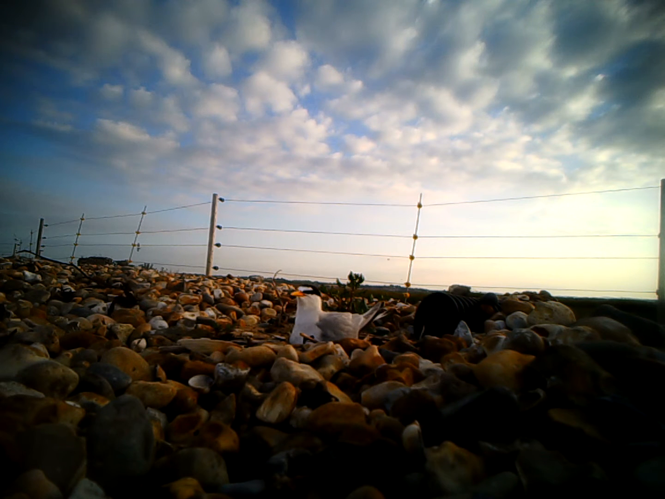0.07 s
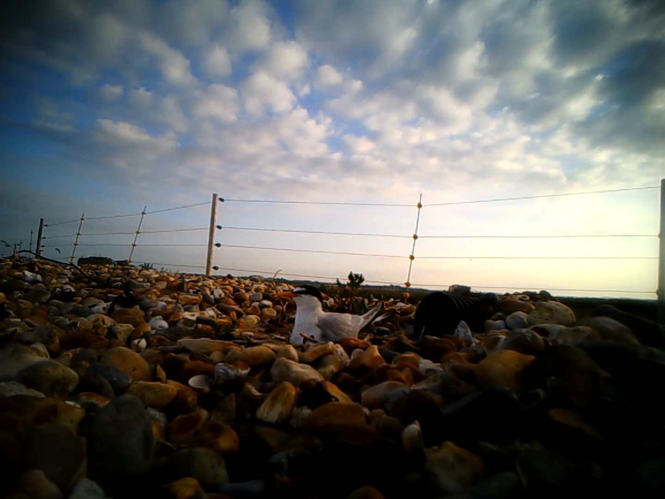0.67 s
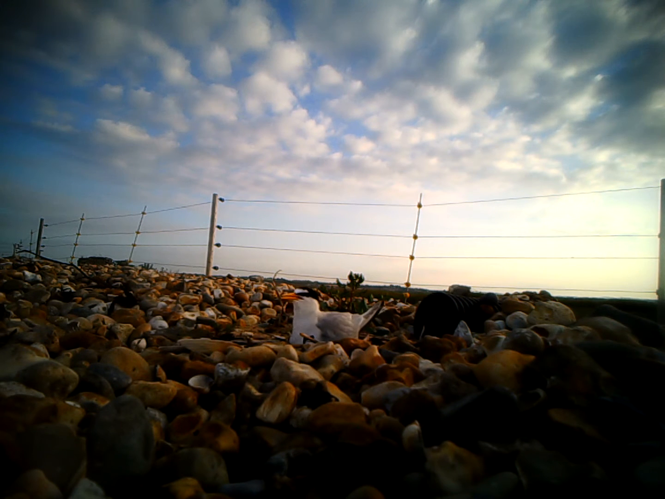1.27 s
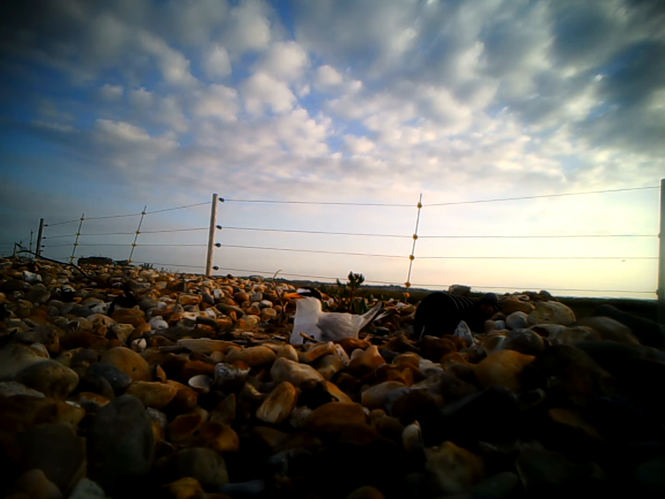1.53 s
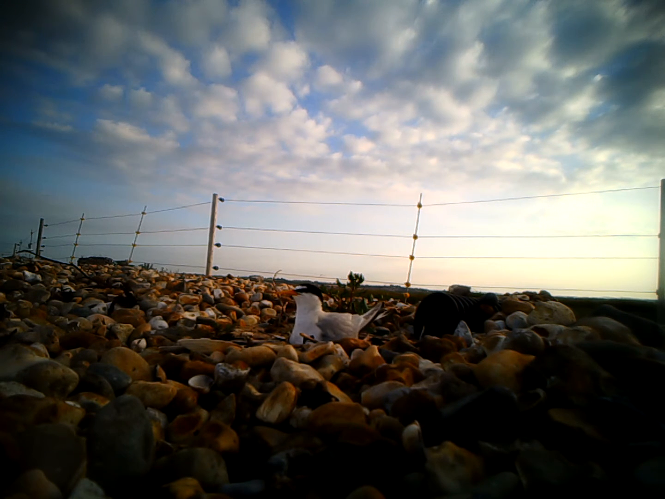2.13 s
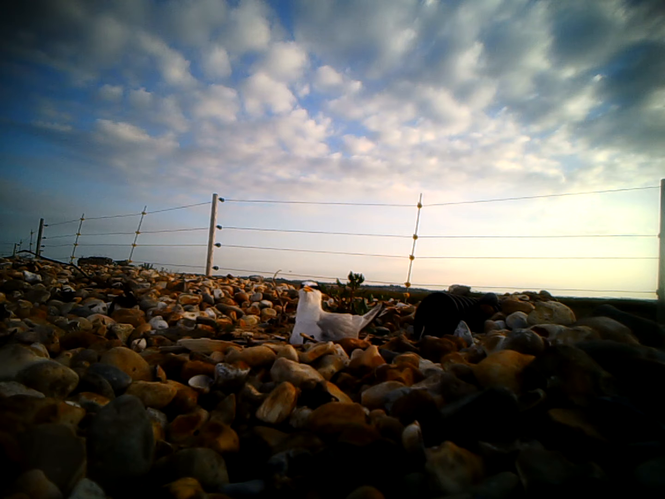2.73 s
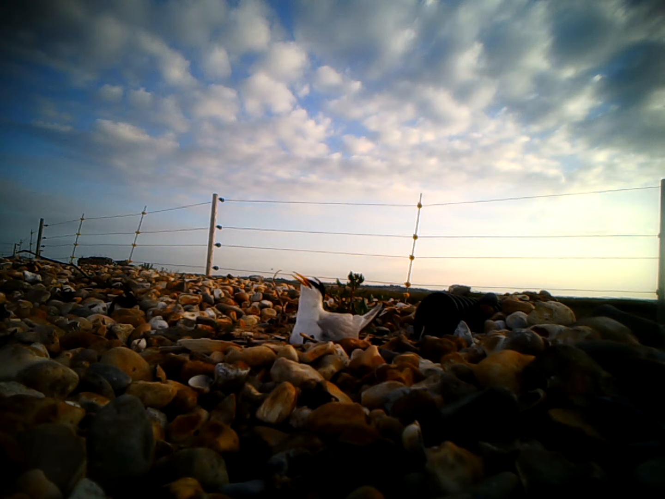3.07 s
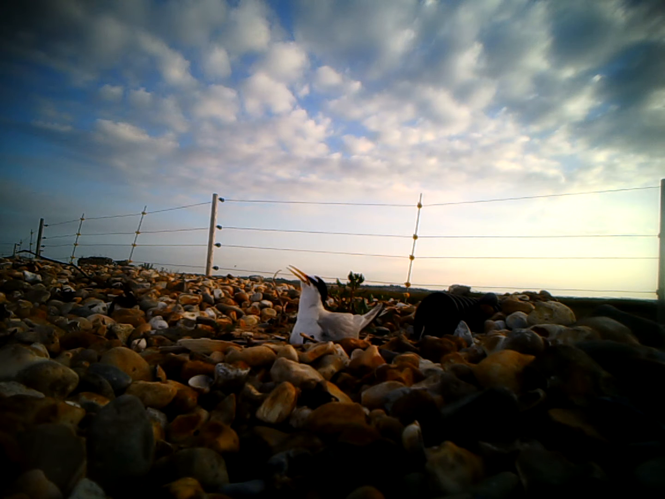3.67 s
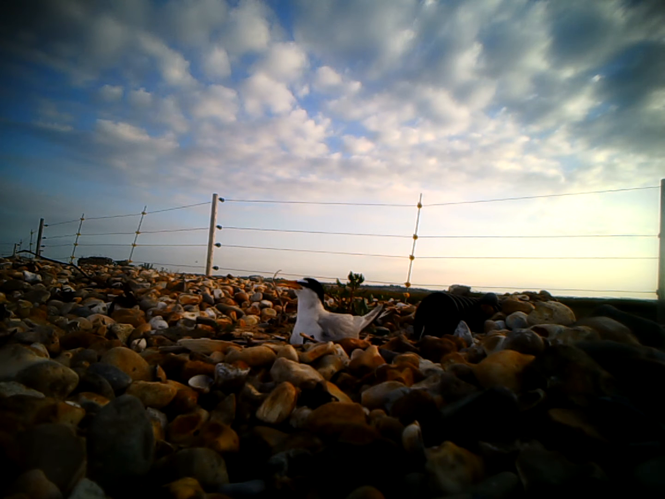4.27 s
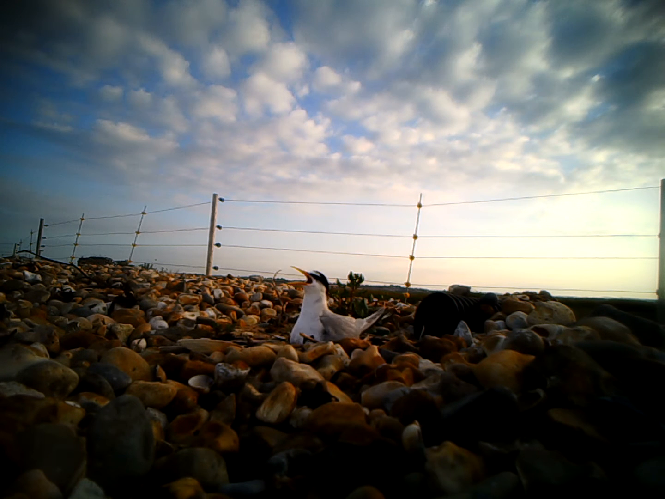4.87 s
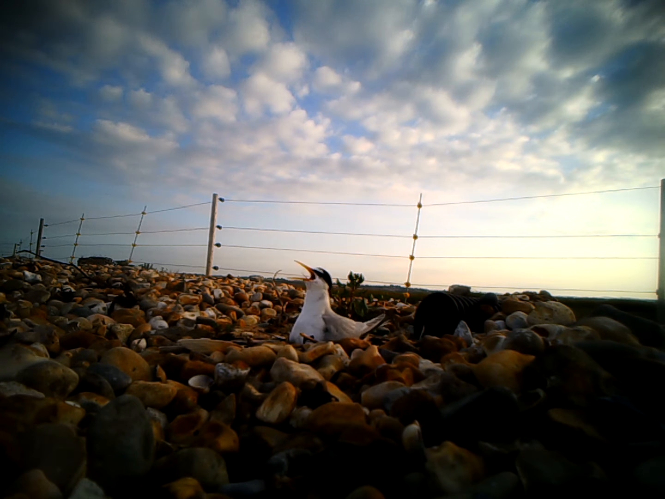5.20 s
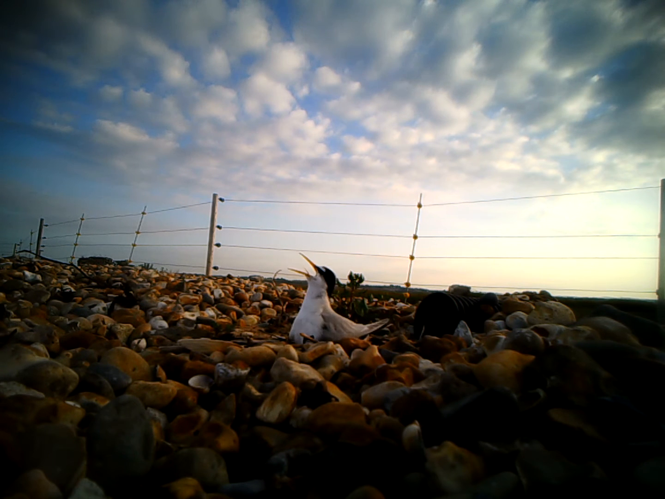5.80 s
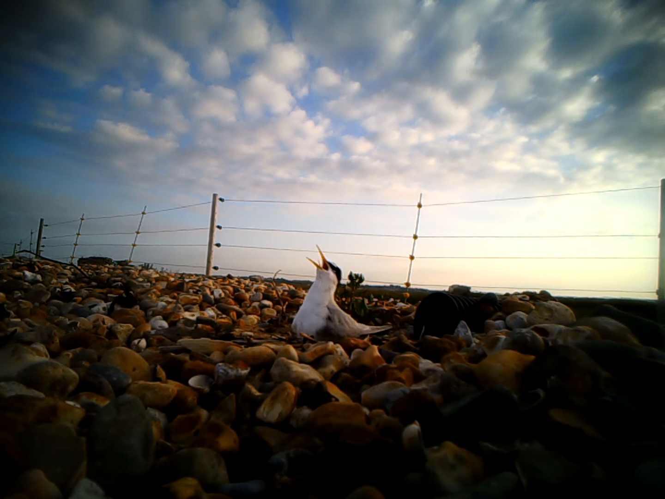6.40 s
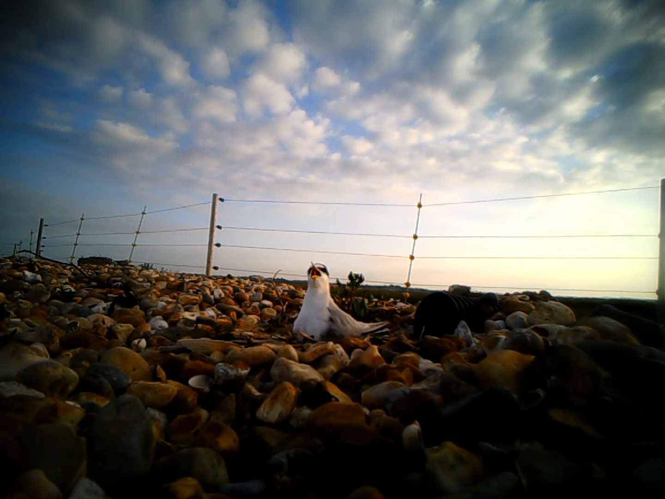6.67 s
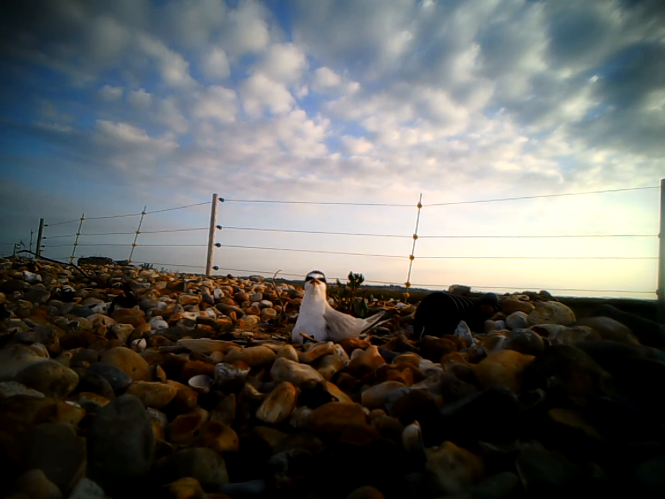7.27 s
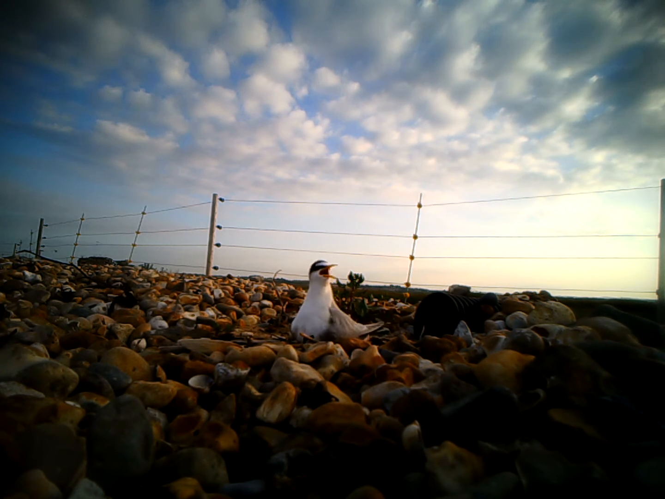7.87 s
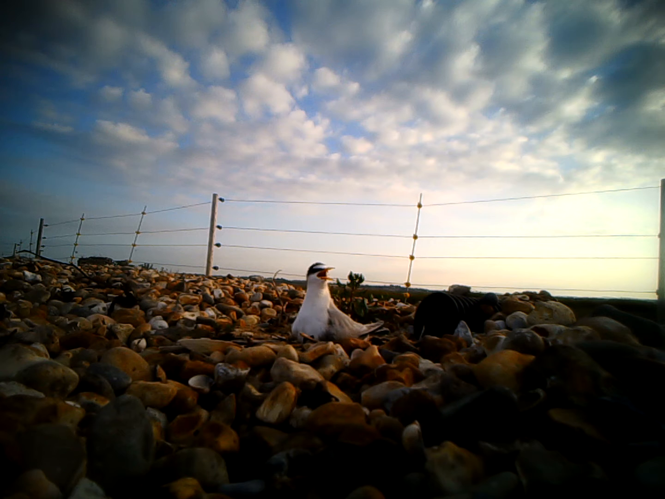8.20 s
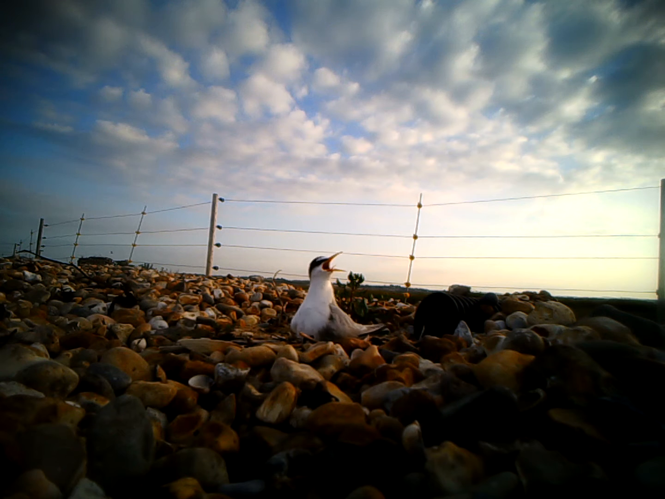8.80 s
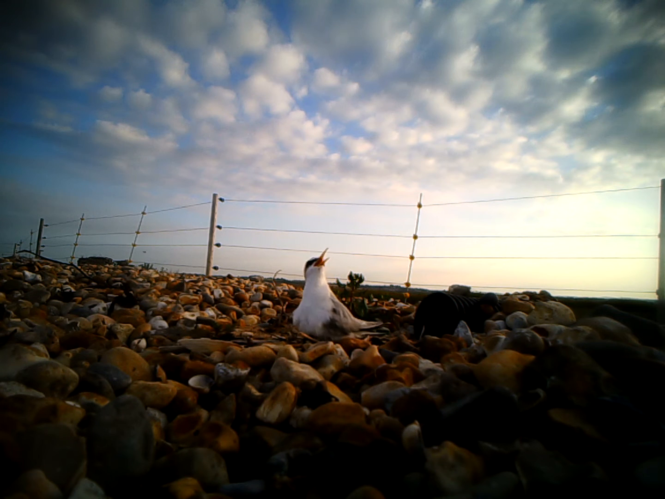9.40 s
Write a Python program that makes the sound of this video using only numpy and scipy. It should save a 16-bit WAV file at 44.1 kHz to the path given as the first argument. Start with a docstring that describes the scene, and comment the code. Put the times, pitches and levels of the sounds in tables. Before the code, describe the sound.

A tern screeches very close to a microphone on a pebble beach, with almost no echo. Each call is short, shrill and raspy, its pitch leaping up and dropping back two or three times. Single screeches come at about 1.2, 2.5 and 3.9 seconds. From 4.7 seconds they repeat three or four times a second, pause briefly just after 7, then resume from 7.5 until about 9.5 seconds. Its mate, also near but softer, adds brief thin whines and hoarse squeals around 1.9 seconds, on and off from 3.7 to 6, most strongly near 6.5, and again near 8.7. Far off, a small bird peeps about three times a second for the first two seconds, then only occasionally. Faint nasal cries and thin wavering whines come and go until about 7.5 seconds. A quiet, steady air rumble and hiss lie underneath throughout.

```python
"""Terns on a pebble beach

A tern screeches close to a microphone on the ground; its mate answers with softer whines and squeals.
Each screech is two or three arches of pitch: the voice breaks upward, a second voice makes it rasp,
and it drops back. Further off are peeps, nasal cries and thin whines, over faint air and mic hiss."""
import sys
import numpy as np
from scipy import signal
from scipy.fft import rfft, irfft
from scipy.io import wavfile
from scipy.ndimage import uniform_filter1d

SR = 44100
rng = np.random.default_rng(int(sys.argv[2]) if len(sys.argv) > 2 else 0)


def wav_out(sig):
    """Save sig, one row per channel (or a flat mono array), as 16-bit PCM at SR to the path in sys.argv[1]."""
    wavfile.write(sys.argv[1], SR, np.round(np.clip(np.atleast_2d(sig).T, -1, 1) * 32767).astype(np.int16))


N = 416744
BAND_LIMIT_HZ = 15750


def gain_of(db):
    """Decibels to amplitude."""
    return 10 ** (np.asarray(db) / 20)


def unit_rms(x):
    """Scales to rms 1."""
    return x / np.sqrt(np.mean(x ** 2) + 1e-20)


def db_at(spectrum, hz):
    """Reads (f/Hz, level/dB) points on a log-frequency axis."""
    f, db = np.transpose(spectrum)
    return np.interp(np.log(hz + 1), np.log(f + 1), db)


def phase_of(hz):
    """Running phase of a pitch curve, in radians."""
    return 2 * np.pi * np.cumsum(hz) / SR


def add(mix, start_s, sound):
    """Mixes a sound in at start_s."""
    part = mix[max(round(start_s * SR), 0):][:len(sound)]
    part += sound[:len(part)]


def smooth(x, size):
    """Rounds the corners of a curve."""
    return uniform_filter1d(uniform_filter1d(x, size), size)


def wobble(count, hz):
    """Random motion of rms 1, rolling off above hz."""
    f = np.fft.rfftfreq(count, 1 / SR)
    return unit_rms(irfft(rfft(rng.standard_normal(count)) / (1 + (f / hz) ** 4), count))


def resonate(x, spectrum):
    """Causal filter with the given spectrum: each pulse rings after it arrives."""
    log_gain = np.log(gain_of(db_at(spectrum, abs(np.fft.fftfreq(2048, 1 / SR)))))
    taps = np.fft.ifft(np.exp(np.conj(signal.hilbert(log_gain)))).real
    return signal.oaconvolve(x, taps[:len(taps) // 2])[:len(x)]


# Noise floor of the beach air and the microphone: f/Hz, relative density/dB
AIR_SPECTRUM = [(20, 2), (35, -14), (50, -5), (70, -10), (120, -16.5), (250, -21), (400, -23.5),
                (800, -25.5), (1550, -27.5), (3000, -30), (6000, -33), (13600, -35), (15500, -38)]
def air(level_db=-51):
    """A steady low rumble of air under even microphone hiss."""
    shape = gain_of(db_at(AIR_SPECTRUM, np.fft.rfftfreq(N, 1 / SR)))
    return gain_of(level_db) * unit_rms(irfft(rfft(rng.standard_normal(N)) * shape, N))


# Whines from far off in the colony: start t/s, length/s, from f/Hz, to f/Hz, level/dB
FAR_WHINES = [(0.799, 0.98, 1940, 1886, -72), (2.65, 0.2, 1850, 1940, -66),
              (3.198, 1.37, 1540, 1947, -67.5), (4.435, 0.59, 2120, 2075, -57.5),
              (5.984, .3, 2270, 2230, -54.5)]
def far_whines(waver=.022, swell_db=4):
    """Thin tones that waver and come and go."""
    out = np.zeros(N)
    for start, length, from_hz, to_hz, db in FAR_WHINES:
        count = int(length * SR)
        drift = wobble(count, hz=6.9) + 2 * wobble(count, hz=160)
        hz = np.linspace(from_hz, to_hz, count) * (1 + waver * drift)
        envelope = gain_of(db + swell_db * wobble(count, hz=19)) * signal.windows.tukey(count, .3)
        add(out, start, np.sin(phase_of(hz)) * envelope)
    return out


# A small bird some way off: middle t/s, top f/Hz, level/dB
PEEPS = [(.131, 3250, -55), (.437, 3250, -54.5), (.772, 3260, -53.5), (1.13, 3280, -53),
         (1.511, 3230, -53.5), (1.968, 3230, -54), (3.47, 2870, -57.5), (4.346, 3250, -58),
         (7.214, 3250, -54)]
def peeps(length_s=.06, sag=.29, fade_db=-10, octave_db=-21):
    """Nearly pure whistles that rise and fall."""
    out, u = np.zeros(N), np.linspace(-1, 1, int(length_s * SR))
    for middle, top_hz, db in PEEPS:
        phase = phase_of(top_hz * (1 - sag * u ** 2))
        whistle = np.sqrt(2) * (np.sin(phase) + gain_of(octave_db) * np.sin(2 * phase))
        envelope = gain_of(db + fade_db * u ** 2) * signal.windows.tukey(len(u), .2)
        add(out, middle - length_s / 2, whistle * envelope)
    return out


def syrinx(hz, level_db, rasp, second_hz, throat, jitter, wander, hiss, pull,
           throb=.11, soft_db=-13, slack_range_db=13):
    """One membrane pulses at hz; the other pulls at it, setting sidebands between the harmonics."""
    count, rasp = len(hz), np.clip(rasp, 0, 1)
    second_phase = phase_of(second_hz * (1 + wander * wobble(count, hz=197)))
    hz = hz * (1 + jitter * (.8 + rasp) * wobble(count, hz=500))
    phase = phase_of(hz) + pull * rasp * np.sin(second_phase)
    # with little effort the membrane closes softly and loses treble
    slack = np.minimum((level_db.max() - level_db) / slack_range_db, 1) ** 2
    tilt_db = soft_db * slack * hz / BAND_LIMIT_HZ
    pulses = sum(gain_of(tilt_db * k) * np.cos(k * phase) * np.clip((BAND_LIMIT_HZ - k * hz) / hz, 0, 1)
                 for k in range(1, 30))
    breath = hiss * (.3 + rasp) * (1 - .5 * slack) * (1 + np.cos(phase))  # air escapes at each opening
    voice = resonate(unit_rms(pulses) + breath * rng.standard_normal(count), throat)
    voice /= np.sqrt(smooth(voice ** 2, size=120) + 1e-12)
    voice *= 1 + throb * rasp * np.cos(phase - 2 * second_phase)  # the two voices beat
    flutter_db = np.interp(hz / hz.max(), [.55, .9], [1.7, .7])  # deeper at low pitch
    envelope = gain_of(level_db + flutter_db * wobble(count, hz=170))
    from_edge = np.minimum(np.arange(count), np.arange(count)[::-1])
    return voice * envelope * np.minimum(from_edge / 60, 1)


# Tone of the cries as they reach the microphone over the shingle: f/Hz, level/dB
CRY_SPECTRUM = [(900, -29), (2000, -5), (3000, -5.5), (4100, -4.5), (5050, 3), (6000, -11.5), (7500, -15.5),
                (10000, -29)]
# Cries further along the beach: middle t/s, length/s, top f/Hz, level/dB, rasp/0-1
NASAL_CRIES = [(0.379, 0.21, 953, -61, 0.5), (1.057, 0.2, 975, -63.5, 0.06),
               (2.462, 0.13, 1153, -55.5, 0.2), (3.107, 0.18, 1004, -52.5, 0.4),
               (3.282, 0.19, 1040, -60, 0.8), (3.555, 0.18, 1009, -49.5, 0.27),
               (4.493, 0.11, 1034, -53, 0.35), (4.618, 0.27, 1007, -56.5, 1),
               (6.313, 0.15, 963, -51.5, 0.26), (6.911, 0.1, 1030, -49.5, 0.5),
               (7.397, 0.13, 1036, -47.5, 0.25)]
def nasal_cries(sag=.12, fade_db=-11, rattle_hz=85):
    """Each cry swells and fades on one shallow arch of pitch, with a fast, uneven rattle."""
    out = np.zeros(N)
    for middle, length, top_hz, db, rasp in NASAL_CRIES:
        u = np.linspace(-1, 1, int(length * SR))
        rattle = np.sin(phase_of(rattle_hz * (1 + .22 * wobble(len(u), hz=38.8))))
        hz = top_hz * (1 - sag * u ** 2 + .01 * rattle + .007 * wobble(len(u), hz=25))
        cry = syrinx(hz, db + fade_db * u ** 2, rasp, .4 * hz, CRY_SPECTRUM,
                     jitter=.01, wander=.1, hiss=.06, pull=.45)
        flicker = gain_of(2 * wobble(len(u), hz=30) - 1)
        add(out, middle - length / 2, cry * (1 + .65 * rattle) * flicker)
    return out


# A tern's throat and bill from close by: f/Hz, level/dB
THROAT_SPECTRUM = [(350, -15), (950, -21.5), (1300, -17.5), (1800, -21), (2600, -11), (3300, -4),
                   (4000, -1), (5050, 4.5), (5900, -6.5), (7000, -13.5), (8800, -33.5), (10500, -33),
                   (13200, -46), (15500, -38)]
# The bill opens and turns: t/s, factor on throat resonances, low ring/dB, high ring/dB, top treble/dB
BILL_POSES = [(1.22, 0.89, 17.5, 19, -5), (2.53, 0.94, 17, 19, 1.5), (3.92, 0.95, 19, 16, -1.5),
              (4.97, 1, 13, 8, 3), (5.8, 1, 10.5, 13.5, 2.5), (6.6, 1.015, -0.5, 18, 0),
              (7.8, 1.007, 4, 16, 2), (9.3, 1.019, 1, 20.5, 0.5)]
def throat_at(time_s, low_ring_hz=7950, high_ring_hz=11950, low_width_hz=520, high_width_hz=750):
    """The throat's spectrum at one moment, with two treble resonances of the open bill."""
    times, *columns = np.transpose(BILL_POSES)
    stretch, low_db, high_db, top_db = (np.interp(time_s, times, column) for column in columns)
    hz = np.geomspace(300, BAND_LIMIT_HZ, 200)
    low_ring = low_db * np.exp(-((hz - low_ring_hz) / low_width_hz) ** 2)
    high_ring = high_db * np.exp(-((hz - high_ring_hz) / high_width_hz) ** 2)
    shelf = db_at([(7000, 0), (10000, top_db)], hz)
    return np.c_[hz, db_at(THROAT_SPECTRUM, hz / stretch) + low_ring + high_ring + shelf]


def mate_note(hz, db, rasp, throat, attack_s=.0089, release_s=.007, edge_db=-14,
              quaver_share=.018, quaver_db=2.2, quaver_hz=90, **grain):
    """One note on the pitch curve hz: it swells, holds and fades, and quavers when hoarse."""
    t = np.arange(len(hz)) / SR
    shut = 1 - np.minimum(np.minimum(t / attack_s, t[::-1] / release_s), 1)
    hz = hz * (1 + quaver_share * rasp * wobble(len(t), hz=quaver_hz))
    db = db + edge_db * shut + quaver_db * rasp * wobble(len(t), hz=quaver_hz)
    return syrinx(hz, db, rasp, .34 * hz, throat, pull=.65, **grain)


# The mate whines near the microphone: start t/s, length/s, from f/Hz, to f/Hz, warble/share of pitch,
# level/dB before the tone filter, rasp/0-1, factor on throat resonances
MATE_WHINES = [(1.853, 0.068, 1314, 1580, 0, -46.5, 0.3, 1.19),
               (3.799, 0.081, 943, 1530, 0.0041, -35.5, 0.34, 1.08),
               (5.213, 0.063, 1147, 1130, 0.021, -46.5, 0.35, .88),
               (5.732, 0.08, 1270, 1315, 0.034, -35, .35, 0.88),
               (5.846, 0.046, 1364, 1413, 0.026, -26.5, 0.76, 0.98),
               (5.915, 0.086, 1490, 1394, 0.047, -34, 0.4, 1.14),
               (6.506, 0.102, 1362, 1416, 0.075, -24, .1, 1.04),
               (8.671, 0.051, 1290, 1400, 0, -37.5, 0.1, 1.02),
               (9.019, 0.038, 2240, 2460, 0, -54, .1, 0.76)]
# Its squeals: start t/s, length/s, top f/Hz, level/dB before the tone filter, factor on throat resonances
MATE_SQUEALS = [(1.893, .054, 2210, -41.5, 1.23), (3.655, 0.099, 2230, -46.5, 1.1),
                (3.877, 0.045, 2276, -24.5, 1.16), (4.177, 0.072, 1970, -47.5, 1.02),
                (4.256, 0.095, 2160, -41.5, 1.02), (4.882, 0.074, 2360, -36, 1.04),
                (5.685, 0.045, 2430, -35.5, 0.77), (6.437, 0.061, 2535, -24, 0.94),
                (6.521, 0.031, 2160, -17.5, 1.02), (6.556, 0.025, 2050, -22.5, 1),
                (8.712, 0.07, 2020, -34, 1.06)]
def mate(warble_hz=40.9, db_per_octave=22, squeal_sag=.0707, squeal_peak=.65, squeal_fade_db=-4):
    """Thin whines glide and warble, louder as they rise; hoarse squeals follow one high, shallow arch."""
    out = np.zeros(N)
    for start, length, from_hz, to_hz, warble, db, rasp, stretch in MATE_WHINES:
        t = np.arange(0, length, 1 / SR)
        hz = np.linspace(from_hz, to_hz, len(t)) * (1 - warble * np.cos(2 * np.pi * warble_hz * t))
        level_db = db + db_per_octave * np.log2(hz / hz.mean())
        throat = throat_at(start) * [stretch, 1]
        add(out, start, mate_note(hz, level_db, rasp, throat, jitter=.004, wander=.04, hiss=.015))
    for start, length, top_hz, db, stretch in MATE_SQUEALS:
        droop = (np.linspace(0, 1, int(length * SR)) / squeal_peak - 1) ** 2
        squeal = mate_note(top_hz * (1 - squeal_sag * droop), db + squeal_fade_db * droop, rasp=.9,
                           throat=throat_at(start) * [stretch, 1], jitter=.011, wander=.08, hiss=.055)
        add(out, start, squeal)
    tone = [(1400, -7.5), (3500, -2.5), (4350, 2.5), (5000, -3),
            (5700, -1.5), (7800, -9.5), (9200, -1), (12000, -1)]  # f/Hz, level/dB
    return resonate(out, tone)


# The close tern's voice, arch by arch: factor on the rasp, factor on the second voice's pitch
ARCH_VOICE = [(.93, 0.97), (1.04, .97), (1.08, .96)]
BREAK_HZ = 1560  # arches that top this leap into the upper register
def arches(start, length, count, rise_s, second_s, hold_s, top_hz, last_hz, trough_hz, level_db,
           fade_db, rasp, second_hz, opening_hz=508, opening_db=-9, trough_db=-15, trough_place=.41):
    """Effort swings two or three times, losing strength; gives one row for each arch of pitch."""
    ups = start + np.array([rise_s, second_s, second_s * 1.67])[:round(count)]
    early = len(ups) - 1  # arches before the last; a middle one is shorter and slightly lower
    downs = np.append((ups[:2] + hold_s * np.array([1, .72]))[:early], start + length)
    tops = [top_hz, top_hz * .97][:early] + [last_hz]
    lows = [(start, opening_hz, level_db + opening_db)]
    lows += [(down + trough_place * (up - down), trough_hz, level_db + trough_db)
             for down, up in zip(downs, ups[1:])]
    rows = []
    for k, (low, up, down, hz, (rougher, slower)) in enumerate(zip(lows, ups, downs, tops, ARCH_VOICE)):
        # an arch that fails to break upward is softer and clearer
        register_db, arch_rasp = (0, rasp * rougher) if hz > BREAK_HZ else (-2.5, .073)
        top_db = level_db + k * fade_db + register_db
        rows.append((*low, up, down, hz, top_db, arch_rasp, second_hz * slower))
    return rows


def screech_contour(arch_rows, leap=1.35, snap_s=.0005, crest=.38, lead_sag=.0289, trail_sag=.15,
                    onset_db=-12, rise_db=-3, fall_db=-11, flank_db=-2,
                    close_s=.01, close_hz=700, close_db=-19):
    """Pitch climbs from each low point, leaps into the upper register, arches, and drops back."""
    points = []  # t/s, f/Hz, level/dB, rasp, second voice f/Hz
    for low_s, low_hz, low_db, up_s, down_s, top_hz, top_db, rasp, second_hz in arch_rows:
        step = leap if top_hz > BREAK_HZ else 1  # low arches stay in the lower register
        entry_hz, exit_hz = top_hz * (1 - lead_sag) / step, top_hz * (1 - trail_sag) / step
        spent_db = fall_db * (down_s - up_s) / .051 if step > 1 else 0  # long high arches run out of air
        climb_s, climb_hz, climb_db = (low_s + up_s) / 2, entry_hz - low_hz, top_db - low_db
        if points:  # rounded trough after the arch before
            s, hz, db = points[-1][:3]
            approach = [((s + low_s) / 2, low_hz + .43 * (hz - low_hz), low_db + .05 * (db - low_db), 0),
                        (low_s, low_hz, low_db, 0),
                        (climb_s, low_hz + .18 * climb_hz, low_db + .27 * climb_db, 0)]
        else:  # the first few pulses come singly and speed up
            approach = [(low_s, low_hz, low_db + onset_db, .2),
                        (climb_s, low_hz + .65 * climb_hz, low_db + .051 * climb_db, .2)]
        points += [(*point, second_hz) for point in approach]
        points.append((up_s - snap_s, entry_hz, top_db + rise_db + flank_db, .1, second_hz))
        for u in np.linspace(0, 1, 9):
            before, after = max(1 - u / crest, 0) ** 2, max((u - crest) / (1 - crest), 0) ** 2
            bend = 1 - lead_sag * before - trail_sag * after
            db = top_db + rise_db * before + spent_db * np.sin(np.pi / 2 * after)
            rough = rasp * max(1 - .35 * before - 1.02 * after, .08)
            points.append((up_s + u * (down_s - up_s - snap_s), top_hz * bend, db, rough, second_hz * bend))
        points.append((down_s + snap_s, exit_hz, top_db + spent_db + flank_db, .15, second_hz))
    points.append((down_s + close_s, close_hz, top_db + close_db, .3, second_hz))
    return np.transpose(points)


# The tern right by the microphone, one row a screech: start t/s, length/s, arches, first break after/s,
# second break after/s, first arch held/s, first top f/Hz, last top f/Hz, trough f/Hz, base level/dB,
# fade per arch/dB, base rasp/0-1, second voice base f/Hz
SCREECHES = [(1.22, 0.12, 2, .036, 0.092, 0.019, 1810, 1770, 1054, -17.5, -2.5, 0.42, 756),
             (2.535, 0.14, 3, 0.018, 0.079, .023, 1954, 1250, 786, -15, -3, 0.92, 770),
             (3.921, 0.12, 2, 0.025, 0.085, 0.032, 1979, 2315, 1112, -15, -2, 0.37, 844),
             (4.671, 0.16, 3, 0.02, 0.081, 0.029, 2047, 2007, 907, -15, -1.5, 1, 845),
             (4.964, 0.16, 3, 0.017, 0.089, 0.037, 2010, 1873, 856, -15, -2, 0.96, 852),
             (5.266, 0.16, 3, 0.019, 0.091, .033, 2002, 1875, 864, -15, -2.5, 0.57, 895),
             (5.528, .159, 3, 0.017, 0.091, 0.036, 1966, 1873, 752, -18, -2.5, .7, 893),
             (5.791, .160, 3, 0.014, 0.091, 0.039, 1979, 1880, 811, -17.5, -2.5, 0.92, 835),
             (6.050, 0.16, 3, .016, 0.091, 0.04, 1998, 1930, 872, -17.5, -2.5, 0.55, 929),
             (6.319, 0.17, 3, .013, .089, 0.043, 2007, 1914, 1195, -17, -1.9, 0.52, 888),
             (6.597, .168, 3, 0.015, 0.09, 0.046, 2074, 2014, 1005, -15, -2, 0.65, 845),
             (6.914, 0.17, 3, 0.015, .091, .043, 2012, 1396, 1185, -15, -3, 0.52, 927),
             (7.522, 0.19, 3, .015, .087, .038, 2048, 1967, 1088, -14.5, -1.3, 0.84, 908),
             (7.823, 0.17, 3, 0.014, .090, 0.037, 1983, 1388, 897, -15, -1.6, 0.99, 788),
             (8.129, 0.18, 3, 0.015, 0.094, 0.04, 1952, 1354, 877, -15, -2.1, 0.98, 790),
             (8.481, .180, 3, 0.016, 0.094, 0.033, 1975, 1398, 916, -14.5, -2.5, 0.77, 798),
             (8.790, 0.17, 3, 0.014, 0.09, 0.043, 2024, 1990, 1066, -15, -1.54, 0.7, 927),
             (9.062, 0.17, 3, .014, 0.092, 0.045, 2037, 2006, 1155, -16, -1.5, 0.5, 920),
             (9.330, 0.12, 2, 0.013, 0.091, 0.041, 2052, 1980, 913, -15.5, -1.5, 0.76, 909)]
def tern(head_turn=.012, trim_db=.6):
    """The sitting bird's screeches; it holds its head a little differently for each."""
    out = np.zeros(N)
    for row, head in zip(SCREECHES, rng.standard_normal(len(SCREECHES))):
        times, *curves = screech_contour(arches(*row))
        t = np.arange(times[0], times[-1], 1 / SR)
        hz, db, rasp, second_hz = (smooth(np.interp(t, times, curve), size=24) for curve in curves)
        throat = throat_at(times[0]) * [1 + head_turn * head, 1]
        screech = syrinx(hz, db, rasp, second_hz, throat, jitter=.004, wander=.014, hiss=.035, pull=.51)
        add(out, times[0], screech)
    return out * gain_of(trim_db)


def shingle(x, wet_db, t60_s):
    """Countless pebbles scatter a weak, short echo."""
    t = np.arange(SR // 2) / SR
    tail = rng.standard_normal(len(t)) * gain_of(-60 * t / t60_s) * (t > .001)
    return x + gain_of(wet_db) * signal.oaconvolve(x, tail / np.linalg.norm(tail))[:N]


def scene():
    """Near and far birds reach one microphone on the ground, alike in both channels."""
    near = shingle(tern() + mate(), wet_db=-21, t60_s=.03)
    far = shingle(nasal_cries() + peeps() + far_whines(), wet_db=-15, t60_s=.11)
    return np.tile(near + far + air(), (2, 1))


def record(dry):
    """The recorder's band limit."""
    lowpass = signal.firwin(511, BAND_LIMIT_HZ, window=("kaiser", 9), fs=SR)
    return signal.oaconvolve(dry, lowpass[None], "same")


dry = scene()
out = record(dry)
wav_out(out)
```